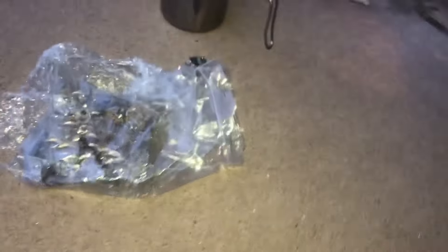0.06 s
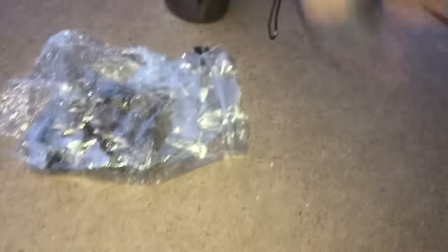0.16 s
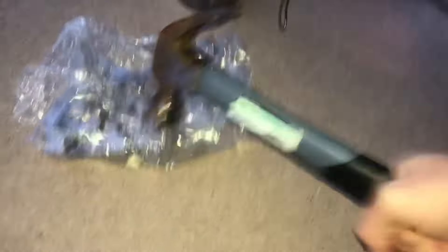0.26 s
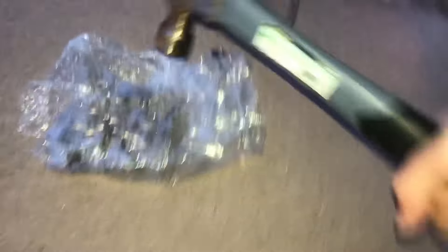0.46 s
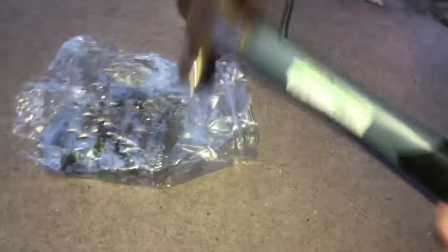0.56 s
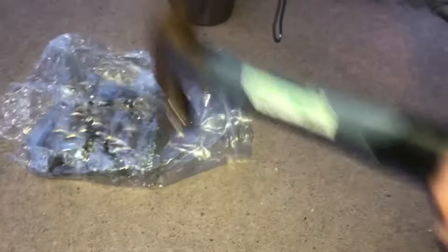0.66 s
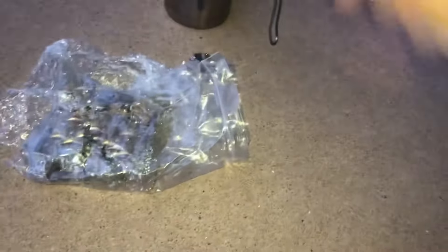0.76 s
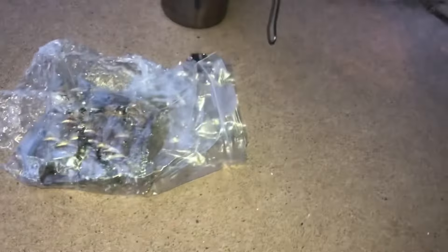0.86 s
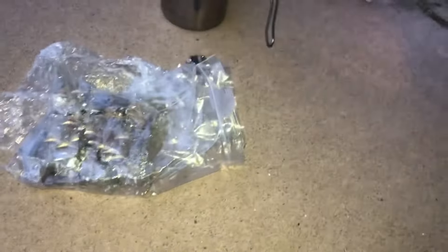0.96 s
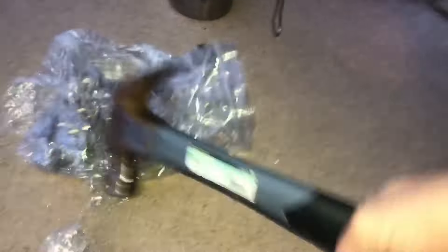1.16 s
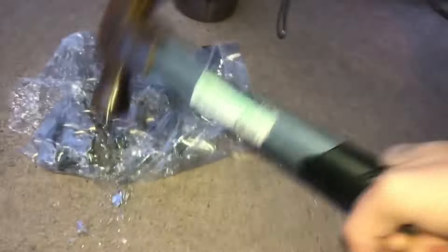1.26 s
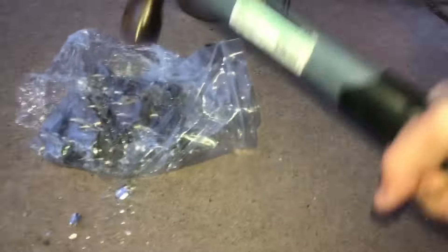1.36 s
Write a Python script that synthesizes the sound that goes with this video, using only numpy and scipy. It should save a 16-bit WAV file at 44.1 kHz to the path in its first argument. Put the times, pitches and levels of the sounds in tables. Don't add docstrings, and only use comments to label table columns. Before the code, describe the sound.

A hammer cracks hard onto bagged metal chunks, a chip pings briefly, faint plastic ticks follow, then a duller, crunchier blow and dense bag crackle; close phone microphone, quiet indoor room, carpeted floor.

```python
import sys
import numpy as np
from scipy import signal
from scipy.fft import rfft, irfft, next_fast_len
from scipy.io import wavfile
from scipy.ndimage import uniform_filter1d

SR = 44100
rng = np.random.default_rng(int(sys.argv[2]) if len(sys.argv) > 2 else 0)


def wav_record(signal):
    frames = np.transpose(np.atleast_2d(signal))
    bounded = np.clip(frames, -1, 1)
    quanta = np.round(bounded * 32767).astype(np.int16)
    wavfile.write(sys.argv[1], SR, quanta)


def amplitude_ratio(level_db):
    exponent = np.asarray(level_db, float) / 20
    return 10 ** exponent


N = 61739

# (time [s], crack peak [dB], crunch level [dB], crunch t60 [s], hammer head level [dB])
BLOWS = [
    (0.2395, -1.5, -19.5, 0.35, -30),
    (1.0958, -5.5, -13.5, .2, -51.5),
]
# (frequency [Hz], density [dB per Hz])
FILM_RUSTLE = [(710, -36.5), (1200, 5.5), (1320, 1.5), (7740, -6), (11200, -11.5), (16000, -27.5)]


def unit(x):
    return x / np.sqrt(np.mean(x ** 2) + 1e-20)


def along(points, hz):
    f, v = np.transpose(points)
    return np.interp(np.log(hz + 1), np.log(f + 1), v)


def filtered(x, response):
    m = next_fast_len(N + SR // 2)
    hz = np.fft.rfftfreq(m, 1 / SR)
    return irfft(rfft(x, m) * response(hz), m)[..., :N]


def hiss(spectrum, patchy_db):
    z = signal.stft(rng.standard_normal(N), nperseg=256)[2]
    patches = uniform_filter1d(rng.standard_normal(z.shape), 5, 0)
    patches = unit(uniform_filter1d(patches, 4, 1))
    x = signal.istft(z * amplitude_ratio(patchy_db * patches), nperseg=256)[1][:N]
    return unit(filtered(x, lambda hz: amplitude_ratio(along(spectrum, hz))))


def swell(start_s, rise_s, t60):
    t = np.clip(np.arange(N) / SR - start_s, 0, None)
    return (1 - np.exp(-(t / rise_s) ** 2)) * amplitude_ratio(-60 * t / t60)


def ring(start_s, modes, rise_s):
    t = np.arange(N) / SR - start_s
    out = np.zeros(N)
    for hz, db, t60 in modes:
        tone = np.sin(2 * np.pi * (hz * t + rng.random()))
        out += amplitude_ratio(db) * swell(start_s, rise_s, t60) * tone
    return out


def grains(s, db, hz, cycles):
    t = np.arange(256)
    u = t * hz[:, None] / SR
    envelope = u / cycles * np.exp(1 - u / cycles)
    wave = amplitude_ratio(db)[:, None] * np.sin(2 * np.pi * u) * envelope
    at = np.round(s * SR).astype(int)[:, None] + t
    return np.bincount(at.ravel(), wave.ravel(), N + SR)[:N]


def resonant(modes):
    def response(f):
        total = 0
        for k, (centre, width, db) in enumerate(modes):
            peak = 1j * f * width / (centre * centre - f * f + 1j * f * width)
            total = total + (-1) ** k * amplitude_ratio(db) * peak
        return total
    return response


def crack(s, peak_db, modes, contacts):
    def hits(f):
        return sum(amplitude_ratio(db) * np.exp(-2j * np.pi * f * (s + delay)) / (1 + 1j * f / dull_hz) ** 2
                   for delay, db, dull_hz in contacts)
    body = resonant(modes)
    x = filtered(np.eye(1, N)[0], lambda f: body(f) * hits(f))
    return amplitude_ratio(peak_db) * x / np.abs(x).max()


def house_hum():
    # (frequency [Hz], density [dB per Hz])
    hum_colour = [(25, -24), (45, -3), (90, 2), (250, -1), (420, -3), (700, -11), (1300, -27), (3000, -40),
                  (16000, -59)]
    return amplitude_ratio(-46.5) * hiss(hum_colour, patchy_db=1.5)


def bag_shift():
    # start [s], rise [s], t60 [s], level [dB]
    slide = (0.5, -0.4, 2.4, -69)
    start_s, rise_s, t60, db = slide
    return amplitude_ratio(db) * swell(start_s, rise_s, t60) * hiss(FILM_RUSTLE, patchy_db=2.5)


def bag_snaps():
    # (time [s], peak [dB], frequency [Hz])
    snap_list = [(.0263, -61, 3300), (.045, -65, 4500), (.053, -56, 800), (.086, -66, 4200),
                 (.133, -67, 4500), (.469, -57, 7500), (.495, -61, 7000), (.516, -62, 8000),
                 (.54, -63, 7500), (.5964, -57, 5000), (.5966, -60, 10500), (.6183, -62, 6000),
                 (.722, -69, 7000), (.802, -69, 9000), (1.279, -50, 750), (1.335, -47, 650),
                 (1.3355, -51, 1500), (1.336, -56, 3500), (1.349, -57, 5000), (1.357, -55, 5000),
                 (1.3685, -52, 5000), (1.379, -57, 6000), (1.382, -55, 3500), (1.390, -59, 7500),
                 (1.396, -55, 4000)]
    s, db, hz = np.repeat(snap_list, 3, axis=0).T
    r = rng.random((len(s), 2))
    s = s + 0.002 * r[:, 0]
    hz = hz * np.exp(1.1 * (r[:, 1] - .5))
    return grains(s, db - 3, hz, cycles=.8)


def bag_settling():
    # (crackle level [dB], t60 [s], rate [grains/s], centre [Hz], rustle level [dB])
    settling = [
        (-57.5, 1, 900, 4500, -55),
        (-46, 0.79, 3300, 5500, -36.5),
    ]
    out = np.zeros(N)
    for (s, *_), (db, t60, rate, hz, rustle_db) in zip(BLOWS, settling):
        r, g = rng.random((2000, 2)), rng.standard_normal(2000)
        t = np.cumsum(-np.log(r[:, 0])) / rate
        keep = s + t < N / SR
        size_db = db - 60 * t / t60 - 2.2 * np.log(r[:, 1])
        grain_hz = np.clip(hz * np.exp(.5 * g), 500, 15000)
        out += grains((s + t)[keep], size_db[keep], grain_hz[keep], cycles=.7)
        out += amplitude_ratio(rustle_db) * swell(s, .03, t60) * hiss(FILM_RUSTLE, patchy_db=1)
    return out


def flying_chip():
    flight = (.246, .276, 6197, -29)
    s, lands_s, hz, db = flight
    landing = amplitude_ratio(-60 * np.clip(np.arange(N) / SR - lands_s, 0, None) / .03)
    return ring(s, [(hz, db, .3)], rise_s=.008) * landing


def splinters(blow, s):
    # (level [dB], t60 [s])
    spray = [
        (-26, .025),
        (-21, .07),
    ]
    # (frequency [Hz], density [dB per Hz])
    spray_colour = [(500, -28.5), (1500, 1), (6000, -3), (11000, -7), (16000, -24)]
    db, t60 = spray[blow]
    return amplitude_ratio(db) * swell(s, .0005, t60) * hiss(spray_colour, patchy_db=3)


def crunch(blow, s, db, t60):
    # (frequency [Hz], density [dB per Hz])
    crunch_colour = [
        [(88, -19.5), (150, -19), (466, -10), (905, -20), (1600, -15.5), (4860, -31), (5680, -28.5),
         (16000, -54.5)],
        [(88, -1.5), (150, -2), (702, -5.5), (1170, -16.5), (1690, -4.5), (2360, -13.5), (6910, -16.5),
         (16000, -29)],
    ]
    gap_s, rise_s = 0.0037, 0.01
    return amplitude_ratio(db) * swell(s + gap_s, rise_s, t60) * hiss(crunch_colour[blow], patchy_db=2.5)


def floor_boards(blow, s):
    # (frequency [Hz], level [dB], t60 [s])
    board_modes = [(69.42, -24, 0.27), (179.3, -27.5, 0.18), (250, -21, 0.14), (313, -35.5, 0.57),
                   (378.8, -27, .3), (495, -24.5, 0.55), (544.4, -36.5, 0.53), (689, -32, 0.43)]
    board_db = [0.5, -2.5]
    gap_s, rise_s = 0.00807, 0.0062
    return amplitude_ratio(board_db[blow]) * ring(s + gap_s, board_modes, rise_s)


def hammer_head(s, db):
    head_hz = [5560, 5674, 4370, 4250, 1579, 1892]
    # (level [dB], t60 [s])
    head_decay = [(-9, .2), (-5, .3), (-8, .22), (-10, .2), (2, .2), (-8, .25)]
    return amplitude_ratio(db) * ring(s, np.c_[head_hz, head_decay], rise_s=0.015)


def carpet_thump(blow, s):
    # (frequency [Hz], width [Hz], level [dB])
    thump_modes = [(645, 160, 1.5), (531, 310, -4), (390, 400, -8), (950, 420, -8)]
    thump_db = [-10.5, -10]
    lag_s, dull_hz = .0006, 1500
    return crack(s, thump_db[blow], thump_modes, [(lag_s, 0, dull_hz)])


def struck_chunks(blow, s, peak_db):
    chunk_hz = [
        [1550, 2590, 3510, 4260, 5600, 7330, 9300, 12000],
        [1800, 2650, 3200, 4200, 5600, 6700, 8530, 10600],
    ]
    # (width [Hz], level [dB])
    chunk_body = [
        [(253.4, -20), (177.6, -2), (438.4, -9.5), (169.4, 1), (150, 2), (350, -6.5), (514, -17), (1500, -21.5)],
        [(403, -6.5), (220, -0.5), (397, -7), (225, -3.5), (407, -7.5), (500, -5.5), (400, -8), (800, -11)],
    ]
    # (delay [s], level [dB], dull above [Hz])
    bounces = [
        [(0, 0, 12000), (.00055, -1, 9000), (.0013, -4, 7000), (.0027, -3, 4500)],
        [(0, 0, 10000), (.0007, -4, 7000), (.0019, -9, 5000), (.0036, -11, 9000)],
    ]
    return crack(s, peak_db, np.c_[chunk_hz[blow], chunk_body[blow]], bounces[blow])


def room(x):
    # (frequency [Hz], t60 [s])
    room_t60 = [(100, .3), (500, 0.95), (2000, 0.54), (6000, 0.14), (14000, 0.74)]
    gap_s, rise_s = 0.0046, 0.0068
    hz, t, z = signal.stft(rng.standard_normal(N), SR, nperseg=256)
    decay = amplitude_ratio(-60 * t / along(room_t60, hz)[:, None])
    tail = signal.istft(z * decay, SR, nperseg=256)[1][:N]
    tail = tail * swell(gap_s, rise_s, 99)
    return amplitude_ratio(-13.5) * signal.fftconvolve(x, tail / np.linalg.norm(tail))[:N]


def hammer_blows():
    out = np.zeros(N)
    for blow, (s, peak_db, crunch_db, crunch_t60, head_db) in enumerate(BLOWS):
        direct = struck_chunks(blow, s, peak_db) + carpet_thump(blow, s)
        out += direct + room(direct)
        out += hammer_head(s, head_db) + floor_boards(blow, s)
        out += crunch(blow, s, crunch_db, crunch_t60) + splinters(blow, s)
    return out


def scene():
    bag = bag_shift() + bag_snaps() + bag_settling()
    return (house_hum() + bag + flying_chip() + hammer_blows())[None]


def roll_off(x):
    return signal.sosfilt(signal.butter(12, 16650, fs=SR, output="sos"), x)


def record(dry):
    # (frequency [Hz], half width [Hz], polarity flip [0-1])
    crossovers = [(3050, 16, .85), (490, 14, 1)]
    # (lag [s], level [dB])
    edge_copies = [(1024 / SR, -26), (512 / SR, -36)]
    bass_hz, top_hz, ceiling = 45, 15750, .86

    def bands(f):
        return np.prod([1 - flip + flip * np.tanh((f - c) / w) for c, w, flip in crossovers], axis=0)

    def copies(f):
        return sum(2 * amplitude_ratio(db) * np.cos(2 * np.pi * f * lag) for lag, db in edge_copies)

    x = filtered(dry, lambda f: (bands(f) + copies(f)) * (1j * f / (bass_hz + 1j * f)) ** 2)
    x = x / (1 + np.abs(x / ceiling) ** 6) ** (1 / 6)
    x = filtered(x, lambda f: .5 - .5 * np.tanh((f - top_hz) / 80))
    return roll_off(x)


dry = scene()
out = record(dry)
wav_record(out)
```